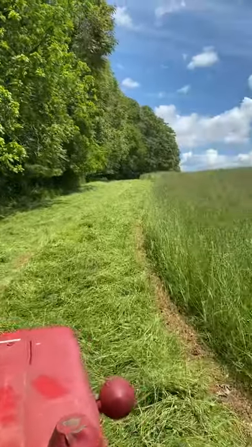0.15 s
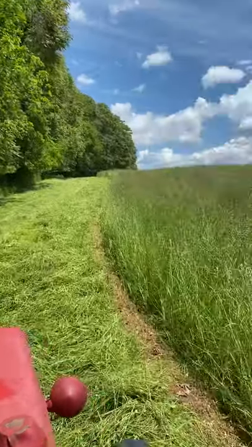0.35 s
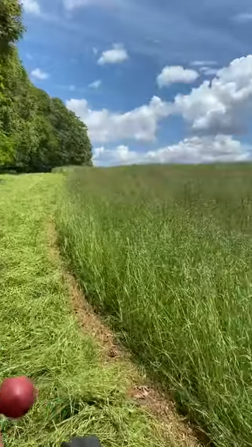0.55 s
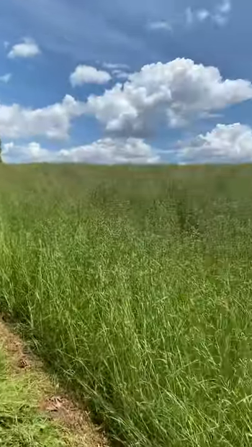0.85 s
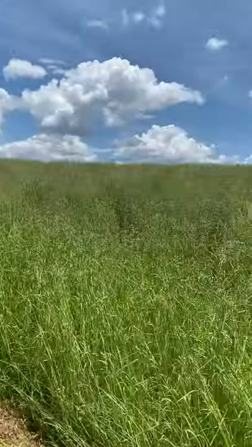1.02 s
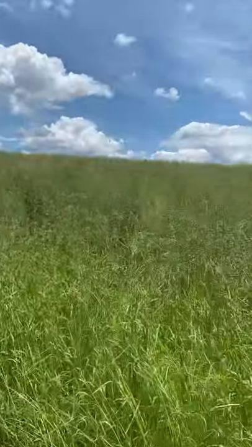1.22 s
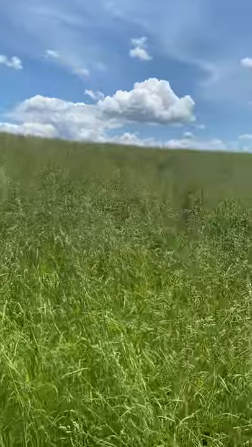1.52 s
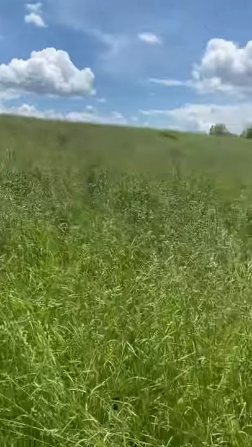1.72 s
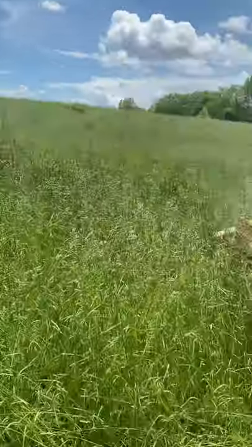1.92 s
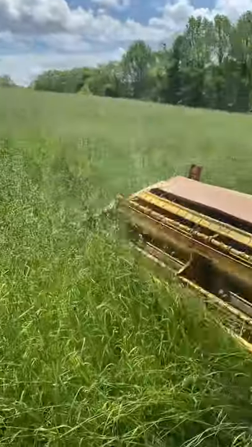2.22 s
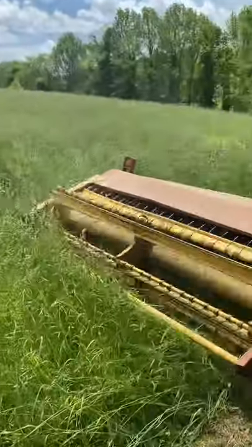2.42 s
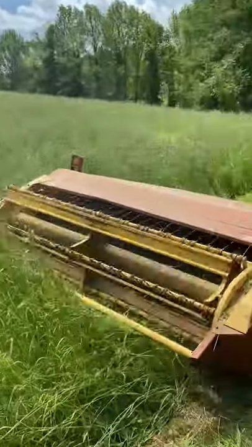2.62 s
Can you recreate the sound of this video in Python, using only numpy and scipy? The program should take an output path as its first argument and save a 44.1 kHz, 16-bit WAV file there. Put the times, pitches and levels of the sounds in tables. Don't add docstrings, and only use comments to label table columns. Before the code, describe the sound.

A diesel tractor drones and knocks steadily outdoors, heard close from the seat on a phone; as it turns to the towed mower, roller roar, shearing hay and metal clanks grow, ending with a heavy slam.

```python
import sys
import numpy as np
from scipy import signal
from scipy.fft import rfft, irfft, next_fast_len
from scipy.io import wavfile
from scipy.ndimage import uniform_filter1d

SR = 44100
rng = np.random.default_rng(int(sys.argv[2]) if len(sys.argv) > 2 else 0)


def volts(x):
    e = np.asarray(x, float) / 20
    return 10 ** e


def pcm_store(signal):
    levels = np.round(np.clip(np.atleast_2d(signal), -1, 1) * 32767)
    wavfile.write(sys.argv[1], SR, levels.astype(np.int16).T)


N = 121716


def evened(x):
    return x / np.sqrt(np.mean(x ** 2) + 1e-20)


def read(points, hz, axis=1):
    p = np.array(points)
    return np.interp(np.log(hz + 1), np.log(p[:, 0] + 1), p[:, axis])


def slow(top_hz, count):
    f = np.geomspace(.4, top_hz, 12)[:, None]
    t = np.arange(0, N + 256, 256) / SR
    curves = []
    for phase in rng.random((count, 12)):
        drift = (np.sin(2 * np.pi * (f * t + phase[:, None])) / np.sqrt(f)).sum(0)
        curves.append(np.interp(np.arange(N) / SR, t, evened(drift)))
    return np.array(curves)


def resonate(x, hz, width):
    b, a = signal.iirpeak(hz, hz / width, SR)
    return signal.lfilter(b, a, signal.lfilter(b, a, x))


def colour(x, points):
    n = next_fast_len(N)
    gain = volts(read(points, np.fft.rfftfreq(n, 1 / SR)))
    return irfft(rfft(x, n) * gain, n)[..., :N]


def bursts(phase, t60, rate_hz, level_db):
    k = np.floor(phase).astype(int)
    age_s = (phase - k) / rate_hz
    return uniform_filter1d(volts(level_db(k) - 60 * age_s / t60), 40)


def hits(table, t60, width_hz, wide_db, trim_db, tone, rise_s):
    length = 12000
    out, t = np.zeros((2, N + length)), np.arange(length) / SR
    for (s, db, hz), noise in zip(table, rng.standard_normal((len(table), 2, length))):
        narrow = evened(resonate(noise, hz, width_hz))
        wide = evened(resonate(noise, hz, hz))
        ring = evened(narrow + volts(wide_db) * wide) * (1 - tone)
        ring = ring + tone * np.sqrt(2) * np.sin(2 * np.pi * hz * t)
        envelope = np.minimum(t / rise_s, 1) * volts(db + trim_db - 60 * t / t60)
        at = round((s - rise_s) * SR)
        out[:, at:at + length] += ring * envelope
    return out[:, :N]


# time in seconds, turn from 0 (bonnet) to 1 (mower).
TURN = [
    (0, 0),
    (.8, 0.14),
    (1.4, .4),
    (1.65, 0.76),
    (2.0, 0.96),
    (2.76, 1.08),
]


def turning(t=None):
    t = np.arange(N) / SR if t is None else t
    return np.clip(np.interp(t, *np.transpose(TURN)), 0, 1.2)


# time in seconds, engine cycles per second, knock level in dB.
DRIVE = [
    (0, 14.38, -37),
    (.4, 14.42, -32),
    (.7, 14.42, -31.5),
    (.85, 14.4, -27),
    (1.2, 14.3, -25.5),
    (1.45, 14.15, -29),
    (1.7, 14.4, -35),
    (2.76, 14.41, -34),
]


def control(axis):
    p = np.array(DRIVE)
    return np.interp(np.arange(N) / SR, p[:, 0], p[:, axis])


def cycles():
    c = np.cumsum(control(axis=1)) / SR
    return c - c[round(1.487 * SR)]


# multiple of the engine cycle, level in dB.
EXHAUST = [(1, -40), (2, -33), (3, -20), (4, -10.5), (5, -3), (6, -11), (7, -15.5), (8, 0.5), (9, -5),
           (10, -10.5), (11, -19), (12, 5), (13, -14), (14, -5.5), (15, -16), (16, -9.5), (17, -19),
           (18, -23.5), (19, -22.5), (20, -9), (21, -25.5), (22, -15.5), (23, -10), (24, -18.5)]
EXHAUST_DB, PIPE_LAG_S = -33, 0.00401
WAVER_DB, WAVER_RAD = .7, .2
TURN_DB_LOW, TURN_DB_PER_ORDER = 4, -0.4


def exhaust():
    c = cycles() - PIPE_LAG_S * 14.44
    waver, turn = slow(9, count=2 * len(EXHAUST)), turning()
    start = rng.random(len(EXHAUST)) * 2 * np.pi
    x = 0
    for i, (order, db) in enumerate(EXHAUST):
        level_db = db + WAVER_DB * waver[2 * i] + (TURN_DB_LOW + TURN_DB_PER_ORDER * order) * turn
        phase = 2 * np.pi * order * c + WAVER_RAD * waver[2 * i + 1]
        if order % 4:
            phase = phase + start[i]
        x = x + volts(level_db) * np.cos(phase)
    return np.sqrt(2) * volts(EXHAUST_DB) * x


# level in dB of each cylinder, in firing order.
CYLINDER_DB = [0, -3, -2, -3]
# frequency in Hz, width in Hz, level in dB.
BLOCK = [(758, 30, -1), (1985, 60, -8), (2250, 40, -2), (2390, 55, -5), (2860, 120, -5), (3150, 200, -8)]
KNOCK_T60, KNOCK_SCATTER_DB = .06, 1.5
KNOCK_RING, KNOCK_TICK = .25, .1


def knock():
    fire, chance = 4 * cycles(), rng.standard_normal(1000)

    def level_db(k):
        return np.take(CYLINDER_DB, k % 4) + KNOCK_SCATTER_DB * chance[k]

    env = bursts(fire, KNOCK_T60, 4 * control(axis=1), level_db)
    tick = env * (np.diff(np.floor(fire), prepend=0) > 0)
    drive = evened((env + KNOCK_RING) * rng.standard_normal((2, N))) + KNOCK_TICK * evened(tick)
    block = sum(volts(db) * evened(resonate(drive, f, 1.83 * w)) for f, w, db in BLOCK)
    return volts(control(axis=2) - 4) * evened(block)


# frequency in Hz, level in dB per Hz.
ENGINE_ROAR = [(35, -96), (60, -54), (180, -57), (300, -56.5), (720, -58), (980, -66), (2300, -63),
               (3900, -75)]
# frequency in Hz, level in dB per Hz.
MOWER_ROAR = [(35, -91), (60, -51), (180, -51), (260, -57), (600, -51), (1100, -62.5), (2300, -62),
              (3900, -73)]
# frequency in Hz, level ahead in dB per Hz, level turned in dB per Hz.
HISS = [(2460, -71, -69), (4170, -74, -71.5), (5400, -77, -73.5), (6800, -71, -77), (9000, -77.5, -73),
        (12600, -81, -83.5), (13700, -86, -88), (16100, -87, -86.5)]
PATCH_DB, SWELL_DB, THROB_DB = 1.5, .7, .9


def roar():
    frames, hz = N // 256 + 5, np.fft.rfftfreq(1024, 1 / SR)
    a = rng.standard_normal((frames, 513, 5)).T
    patches = evened(uniform_filter1d(uniform_filter1d(a[4], 8, 0), 10, 1))
    turn = turning(np.arange(frames) * 256 / SR)
    low_db = read(ENGINE_ROAR, hz)[:, None] * (1 - turn) + read(MOWER_ROAR, hz)[:, None] * turn
    low_db = low_db - np.maximum(hz - 4000, 0)[:, None] * 0.0065
    hiss_db = read(HISS, hz)[:, None] * (1 - turn) + read(HISS, hz, axis=2)[:, None] * turn
    z = (a[:2] + 1j * a[2:4]) * np.hypot(volts(low_db), volts(hiss_db)) * volts(PATCH_DB * patches)
    x = signal.istft(z, nperseg=1024, noverlap=768)[1][:, :N] * volts(19)
    throb = np.cos(2 * np.pi * (4 * cycles() - .15))
    return x * volts(SWELL_DB * slow(12, count=1) + THROB_DB * throb)


# frequency in Hz, width in Hz, level ahead in dB, level turned in dB.
PANELS = [(151, 16, -41, -38), (291, 14, -43, -37), (428.8, 31.5, -35.5, -37.5), (329, 12, -45, -38),
          (593, 30, -50, -37), (754, 12, -37, -42), (991, 41, -44.5, -39), (1568, 29, -44.5, -48.5),
          (1687, 63, -62, -41), (2000, 38, -41, -42), (3003, 75, -45, -51), (4300, 67, -52, -58),
          (5760, 27, -61, -58.5)]
PANEL_WAVER_DB = 1.5


def panels():
    turn, waver = turning(), slow(6, count=len(PANELS))
    x = 0
    for i, (hz, width, ahead_db, turned_db) in enumerate(PANELS):
        ring = evened(resonate(rng.standard_normal((2, N)), hz, 1.4 * width))
        x = x + ring * volts(ahead_db + (turned_db - ahead_db) * turn + PANEL_WAVER_DB * waver[i])
    return x


# frequency in Hz, level in dB.
SHEAR = [(1500, 4.5), (3500, -1), (5500, 7), (8000, -19), (11500, -6), (15700, -20)]
KNIFE_HZ, KNIFE_S, KNIFE_T60, KNIFE_SCATTER_DB = 12.1, 2.388, .16, 2.0
KNIFE_DB, STALKS_DB, STALKS_PER_S = -78, -44.5, 1500


def knife():
    chance, turn = rng.standard_normal(100), turning()
    strokes = (np.arange(N) / SR - KNIFE_S) * KNIFE_HZ
    env = bursts(strokes, KNIFE_T60, KNIFE_HZ, lambda k: KNIFE_SCATTER_DB * chance[k])
    shear = evened(colour(rng.standard_normal((2, N)), SHEAR)) * evened(env)
    size = volts(2.3 * np.minimum(rng.exponential(1, N), 4))
    snaps = size * (rng.random(N) < STALKS_PER_S / SR) * rng.standard_normal((2, N))
    snaps = signal.lfilter([1], [1, -.93], abs(snaps)) * rng.standard_normal((2, N))
    stalks = evened(colour(snaps, SHEAR))
    return volts(KNIFE_DB + 13 * turn) * shear + volts(STALKS_DB + 7.7 * turn) * stalks


# start in seconds, peak in dB, ring in Hz.
PINGS = [(0.4295, -21, 2400), (0.4809, -23, 2370), (0.5014, -22, 2330), (0.5158, -20, 2380),
         (0.5617, -23, 2320), (0.6036, -25, 2070), (0.6211, -24, 2270), (0.7229, -24, 2240),
         (0.7408, -25, 2310), (0.7797, -26, 2270), (0.7927, -23, 2190), (0.8092, -21, 2210),
         (0.8376, -24, 2270), (0.9868, -22, 2370), (1.0022, -22, 2340), (1.0546, -20, 2230),
         (1.1055, -22, 2220), (1.124, -20, 2230), (1.1399, -19, 2230), (1.1763, -18, 2260),
         (1.2093, -22, 2330), (1.2646, -27, 2390), (1.2976, -22, 2420), (1.3215, -21, 2320),
         (1.333, -19, 2370), (1.4168, -24, 2310), (1.4871, -15, 2390), (1.557, -23, 2470),
         (1.6123, -24, 2360), (1.6298, -22, 2370)]
# start in seconds, peak in dB, ring in Hz.
VALVES = [(0.6206, -25, 2870), (0.6555, -24, 2670), (0.675, -24, 2940), (0.7064, -22, 2790),
          (0.7947, -23, 2860), (0.8446, -23, 2770), (0.8645, -23, 2890), (0.9084, -22, 2870),
          (0.9339, -21, 2990), (1.0177, -23, 2900), (1.0556, -24, 3010), (1.0915, -23, 3010),
          (1.5221, -25, 2800), (1.558, -23, 3020)]


def pings():
    return hits(PINGS + VALVES, .06, 250, wide_db=-6, trim_db=-1, tone=.7, rise_s=.002)


# start in seconds, level in dB, pitch in Hz.
WHINE = [
    (.81, -25, 2250),
    (.845, -24, 2260),
    (.875, -23, 2260),
    (.895, -23, 2250),
    (1.07, -26, 2230),
]


def whine():
    return hits(WHINE, .2, 80, wide_db=-20, trim_db=-2.5, tone=.8, rise_s=.006)


# start in seconds, level in dB, ring in Hz.
TINES = [(.84, -24, 4250), (.87, -26, 5200), (.905, -25, 5200), (.945, -25, 5250), (1.4885, -22, 3900),
         (1.559, -18, 3200), (1.8372, -28, 5400), (1.8896, -25, 5270), (1.9066, -21, 5570),
         (2.1475, -19.5, 5160), (2.381, -17, 5690), (2.3994, -19.5, 5620), (2.6464, -25, 4870),
         (2.6707, -28, 4690), (2.7237, -24, 5350)]


def tines():
    return hits(TINES, .06, 900, wide_db=-3, trim_db=-4, tone=.25, rise_s=.003)


# start in seconds, level in dB, ring in Hz.
CLANKS = [(1.28, -16, 1820), (1.3484, -12, 1810), (1.4885, -19, 2390), (1.489, -16, 1850),
          (1.4168, -18, 1800), (1.6991, -15, 1680), (1.7186, -16, 1690), (1.7684, -15, 1670),
          (1.8553, -17, 1670), (1.9555, -15, 1670), (2.1002, -18, 2800), (2.1142, -12, 1570),
          (2.1142, -16, 2300), (2.3222, -16, 1570), (2.3222, -14, 2450), (2.3736, -14, 1960),
          (2.3925, -13, 1580), (2.3925, -15, 2450), (2.4434, -15, 1590), (2.435, -18, 3250),
          (2.5292, -14, 2000), (2.6016, -12, 2950), (2.6435, -14, 1950), (2.6859, -15, 2100),
          (2.735, -14, 2150)]


def clanks():
    return hits(CLANKS, .05, 350, wide_db=-4, trim_db=-4, tone=.4, rise_s=.002)


# start in seconds, level in dB, frame ring in Hz.
BUMPS = [(1.609, -14, 528), (1.75, -13, 468), (1.923, -13, 310), (1.948, -12, 570), (1.965, -10, 310),
         (1.977, -12, 393), (2.225, -12.5, 382), (2.323, -11, 520), (2.496, -9, 377), (2.589, -14.5, 665),
         (2.744, -11, 552)]


def bumps():
    return hits(BUMPS, 0.086, 260, wide_db=-3, trim_db=-4.5, tone=0.51, rise_s=0.003)


# start in seconds, level in dB, centre in Hz.
RATTLES = [
    (1.995, -33, 9000),
    (2.147, -30, 7500),
    (2.255, -33, 11000),
    (2.303, -27, 8000),
    (2.385, -31, 9000),
]


def rattles():
    return hits(RATTLES, .15, 6000, wide_db=6, trim_db=0, tone=0, rise_s=.003)


# start in seconds, level in dB, centre in Hz.
CRASH = [
    (2.381, -17, 220),
    (2.39, -4, 315),
    (2.411, -20, 600),
    (2.385, -23, 3300),
]


def crash():
    clatter = hits([CRASH[0], CRASH[2], CRASH[3]], .3, 300, wide_db=6, trim_db=0, tone=0, rise_s=.006)
    thud = hits(CRASH[1:2], .04, 200, wide_db=0, trim_db=0, tone=.95, rise_s=.004)
    return clatter + thud


# start in seconds, level in dB, pitch in Hz.
LURCH = [
    (2.41, -13, 70.5),
    (2.518, -15.5, 123),
]


def lurch():
    return hits(LURCH, 0.37, 40, wide_db=-11, trim_db=-4.5, tone=.65, rise_s=0.0098)


def scene():
    engine = exhaust() + knock() + pings() + whine()
    mower = knife() + tines() + clanks() + bumps() + rattles() + crash() + lurch()
    return engine + roar() + panels() + mower


# frequency in Hz, likeness from 0 to 1.
SAME = [(150, 0.98), (350, 0.93), (1000, 0.48), (1900, 0.81), (3000, 0.43), (4300, 0.56)]
# frequency in Hz, likeness from 0 to 1.
SAME_TOP = [(4300, 0), (5300, .95), (6500, .99), (8300, .99), (9000, .96), (16000, .98)]
# frequency in Hz, left lead in radians.
LEAD = [(0, 0), (1500, 0.48), (2800, 0.92), (5300, 0.28)]
# frequency in Hz, left lead in radians.
LEAD_TOP = [(5300, 0), (6900, 2.75), (8200, 3.1), (9750, 5.9), (11500, 6.25), (12600, 9.0), (14500, 9.35),
            (15300, 12.3)]
# frequency in Hz, left over right ahead in dB, the same turned in dB.
BALANCE_DB = [(100, 2, 2), (300, 2.5, 2.5), (780, 5.5, 5.5), (1510, -4, 1.5), (3020, -0.5, 3.5),
              (4200, -1.5, -1), (5000, 0, 0)]
BASS_MONO_HZ, EDGE_HZ = 240, 15750


def microphone_ports(dry):
    hz, t, (a, b) = signal.stft(dry, SR, nperseg=1024, noverlap=768)
    turn = turning(t)
    same = np.clip(np.maximum(read(SAME, hz), read(SAME_TOP, hz)), 0, 1)[:, None]
    side_db = read(BALANCE_DB, hz)[:, None] * (1 - turn) + read(BALANCE_DB, hz, axis=2)[:, None] * turn
    lead = (np.interp(hz, *np.transpose(LEAD)) + np.interp(hz, *np.transpose(LEAD_TOP)))[:, None]
    apart = np.clip(hz / BASS_MONO_HZ, 0, 1)[:, None]
    same, side_db, lead = 1 - (1 - same) * apart, side_db * apart, lead * apart
    right = (same * a + np.sqrt(1 - same ** 2) * b) * np.exp(-1j * lead)
    z = np.array([a * volts(side_db / 2), right / volts(side_db / 2)]) * (hz < EDGE_HZ)[:, None]
    return signal.istft(z, SR, nperseg=1024, noverlap=768)[1][:, :N]


def low_pass(x):
    return signal.sosfilt(signal.butter(12, 17090, fs=SR, output="sos"), x)


def record(dry):
    low_cut = signal.butter(4, 43, "high", fs=SR, output="sos")
    mix = microphone_ports(signal.sosfilt(low_cut, dry))
    return low_pass(mix)


dry = scene()
out = record(dry)
pcm_store(out)
```